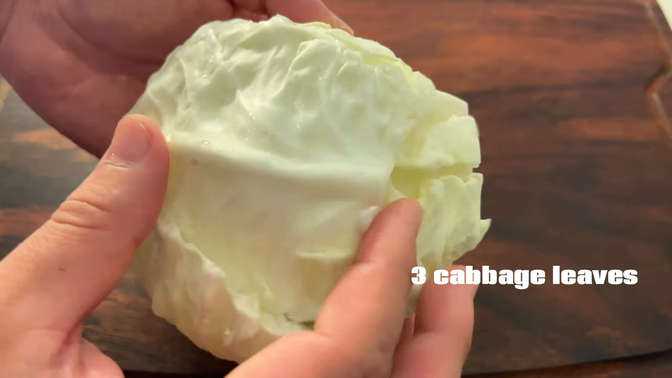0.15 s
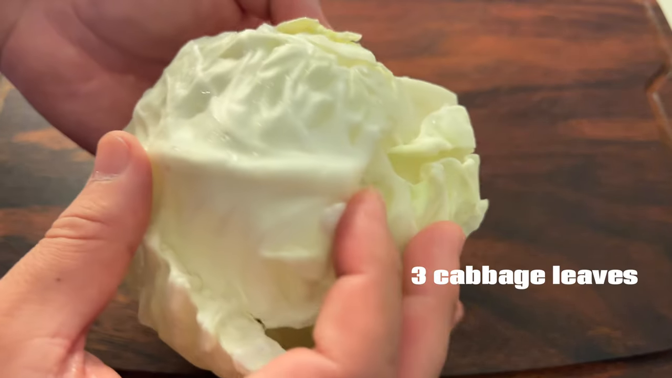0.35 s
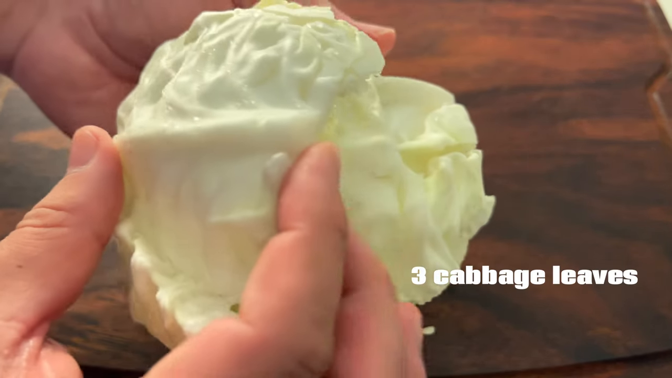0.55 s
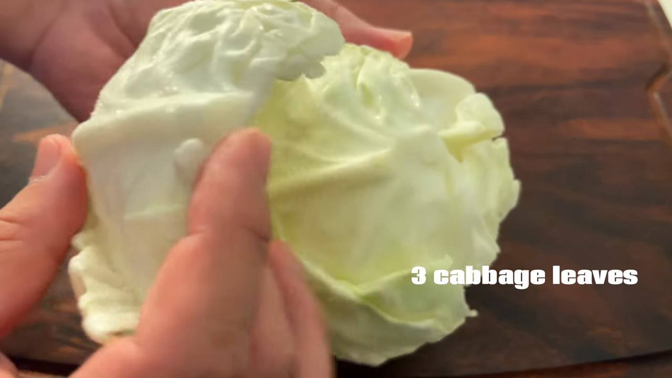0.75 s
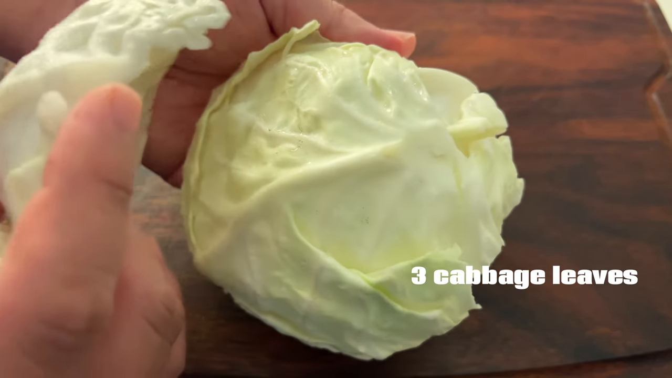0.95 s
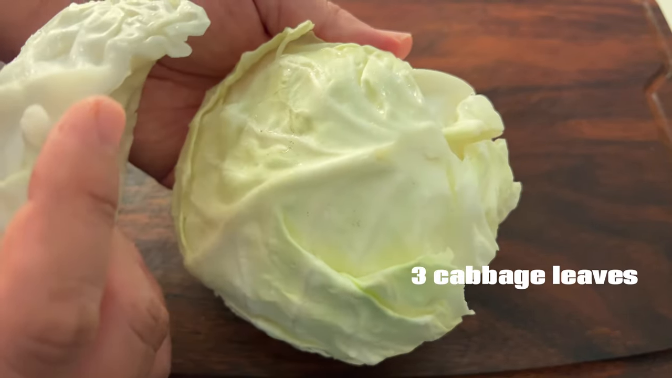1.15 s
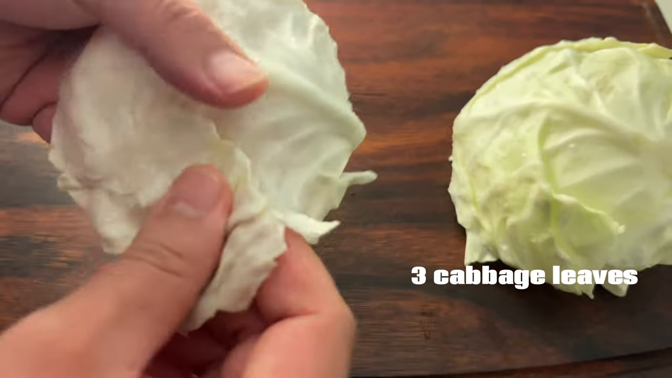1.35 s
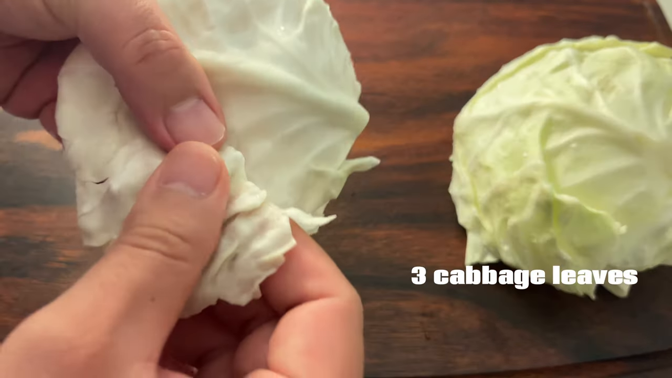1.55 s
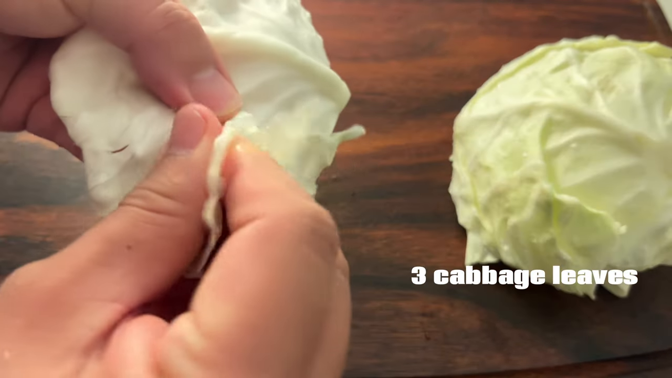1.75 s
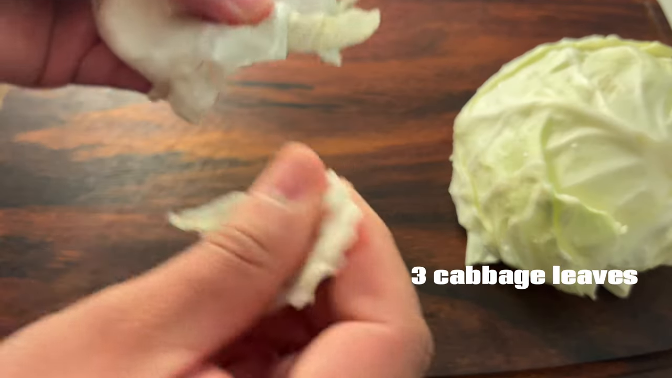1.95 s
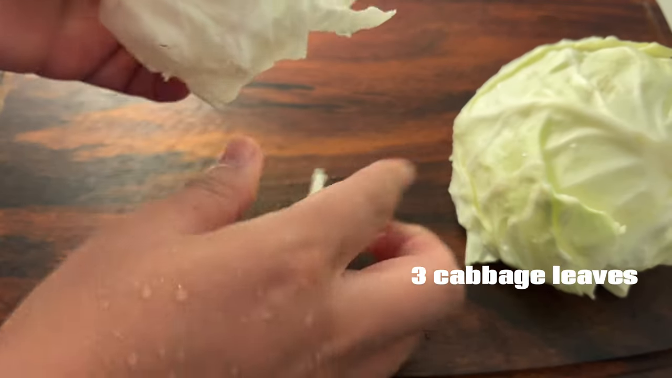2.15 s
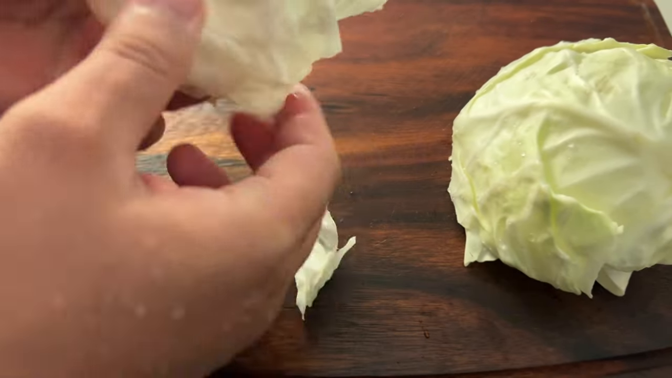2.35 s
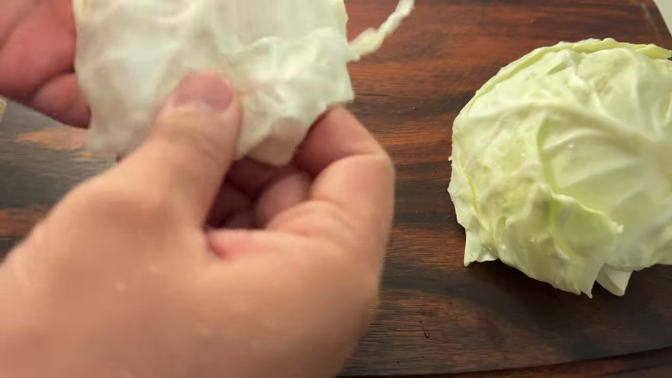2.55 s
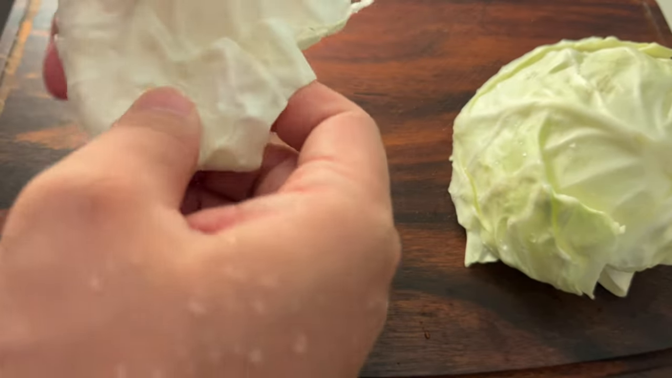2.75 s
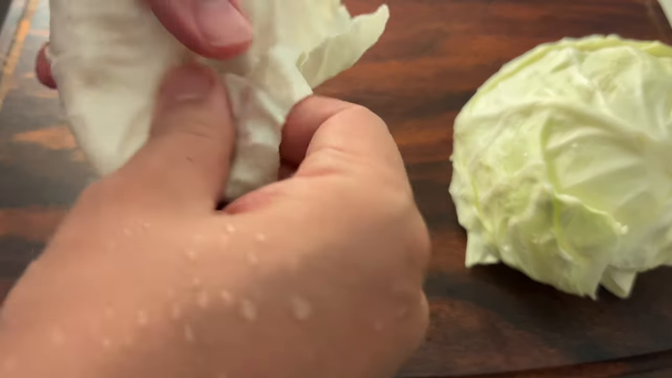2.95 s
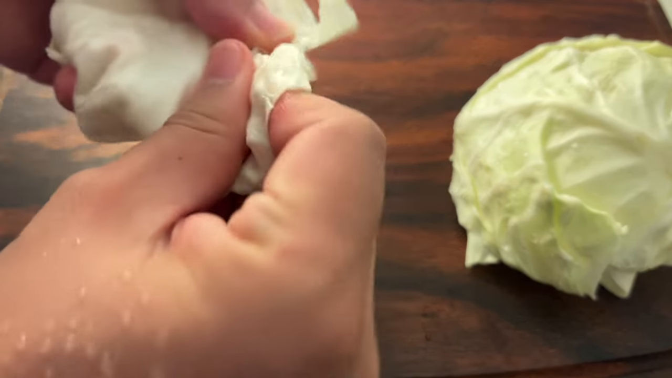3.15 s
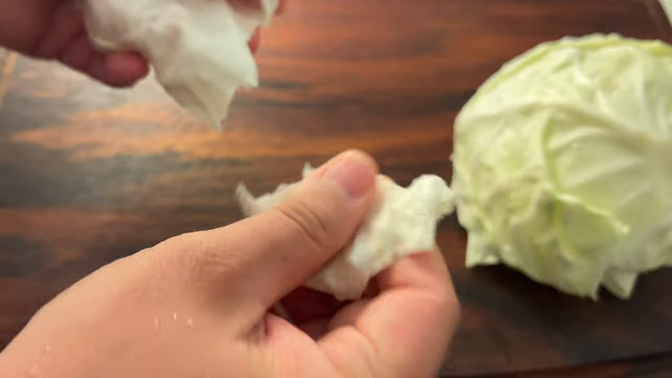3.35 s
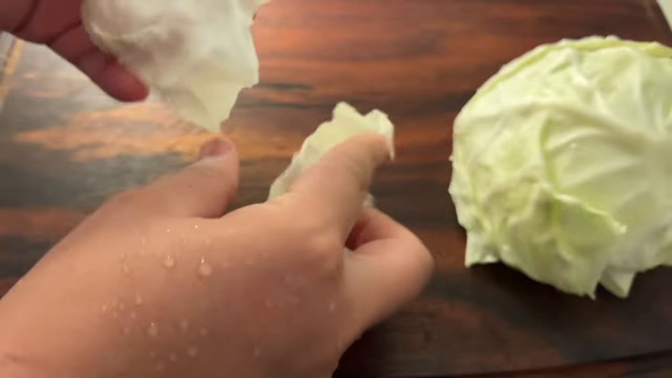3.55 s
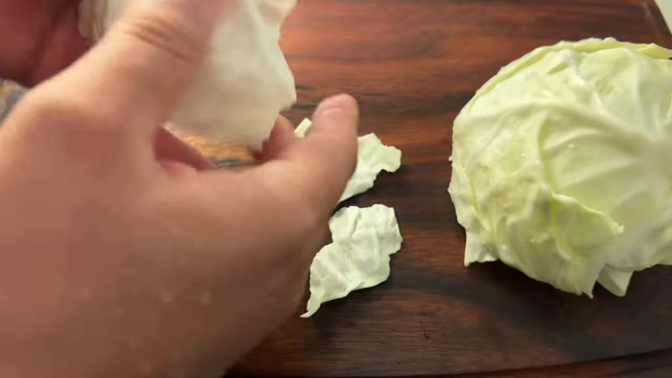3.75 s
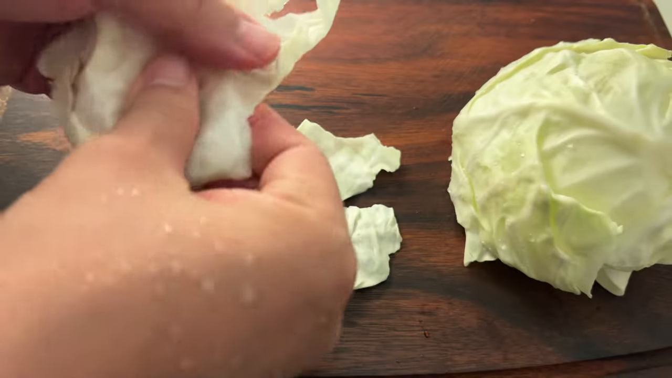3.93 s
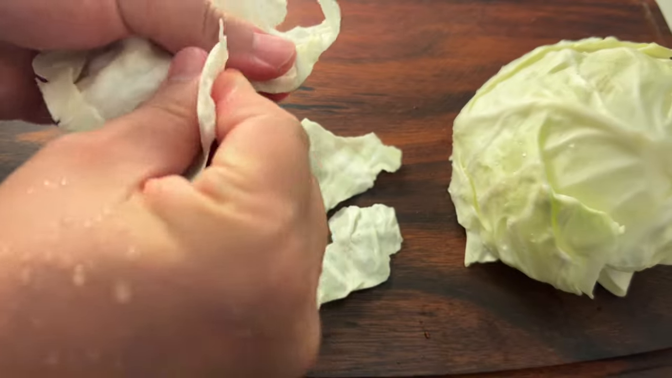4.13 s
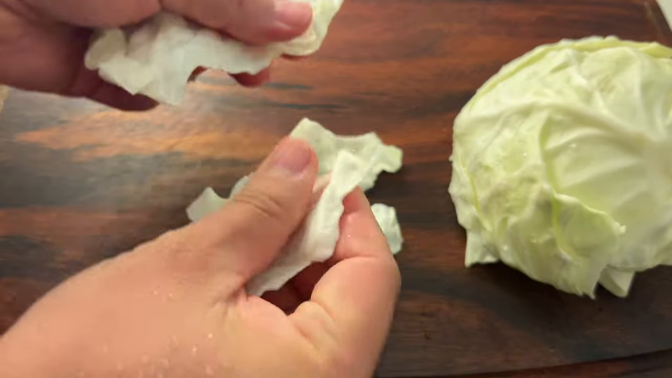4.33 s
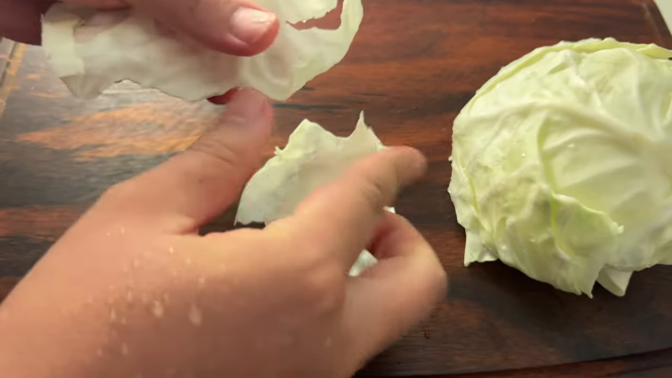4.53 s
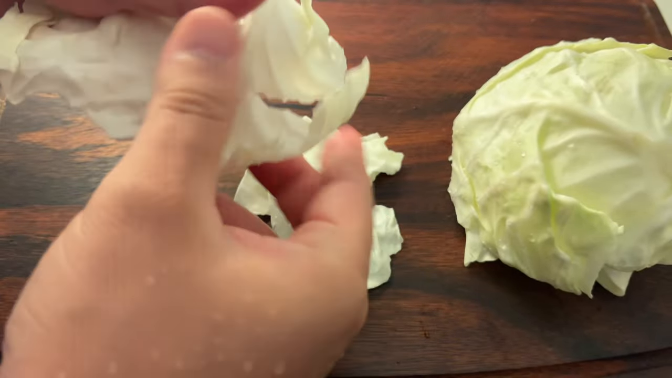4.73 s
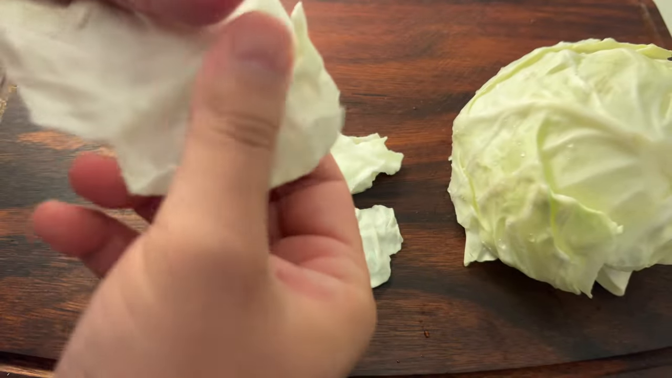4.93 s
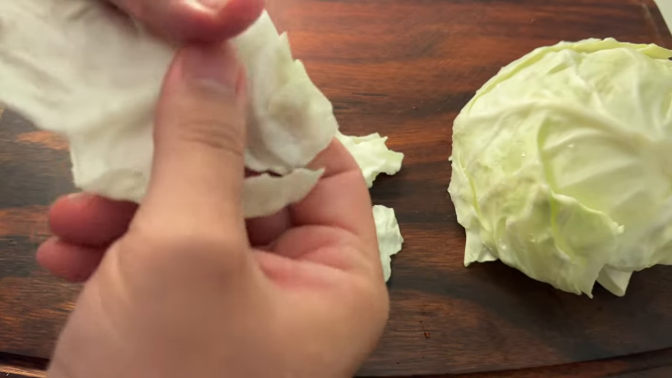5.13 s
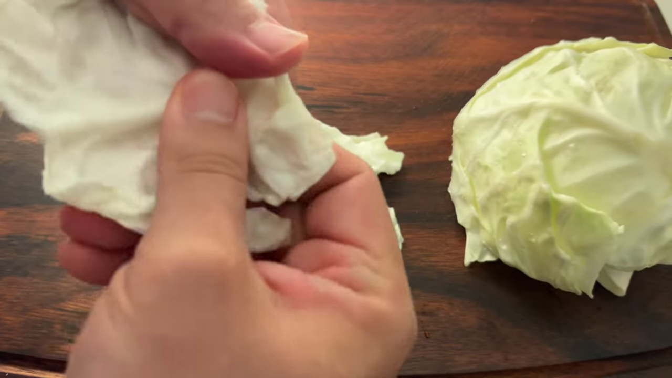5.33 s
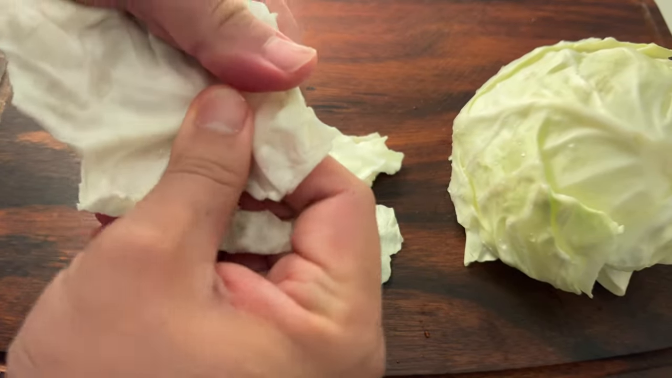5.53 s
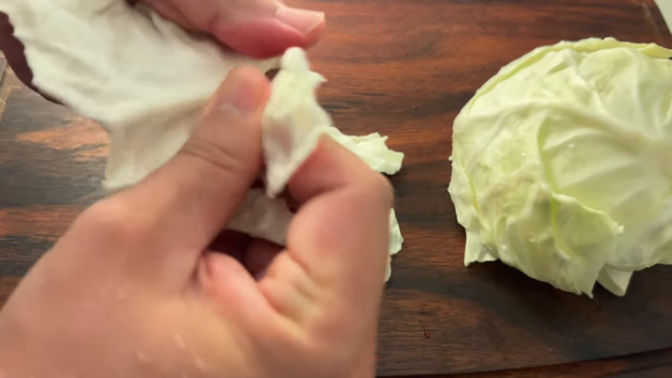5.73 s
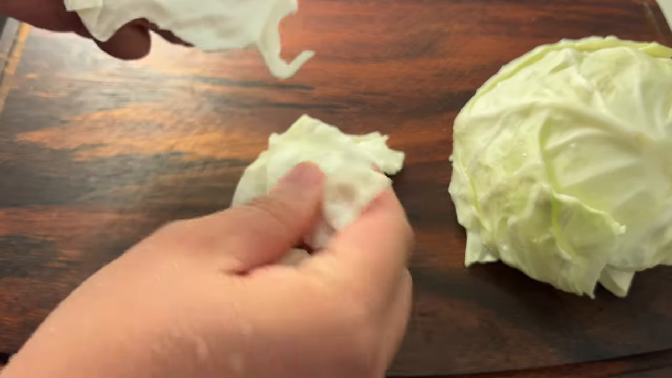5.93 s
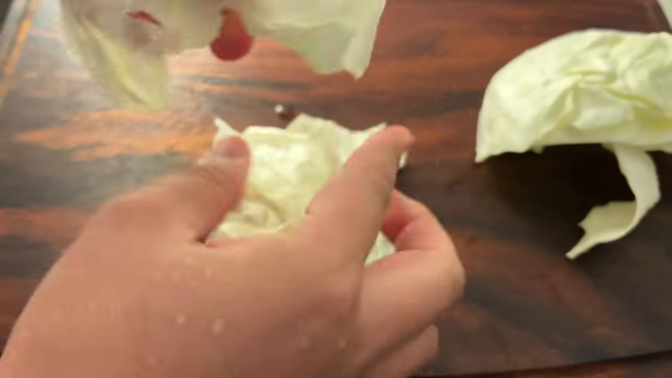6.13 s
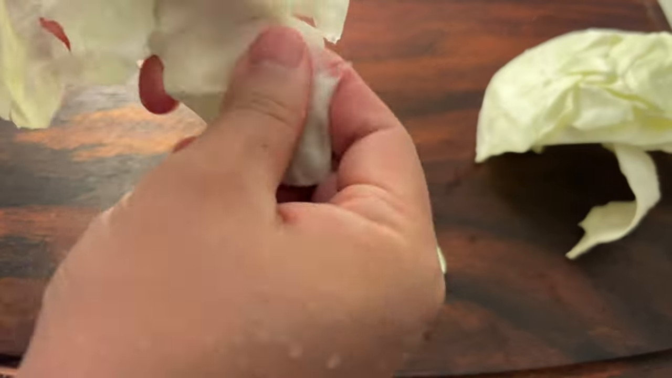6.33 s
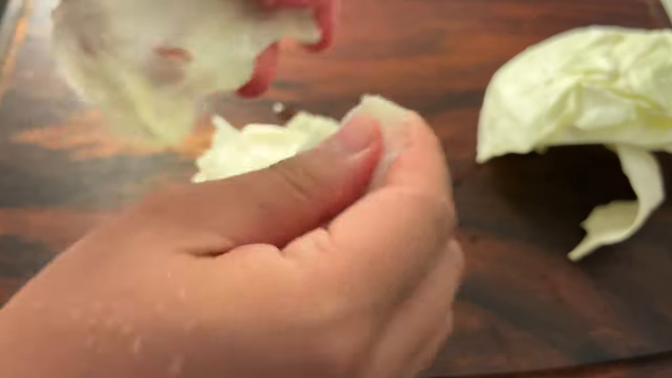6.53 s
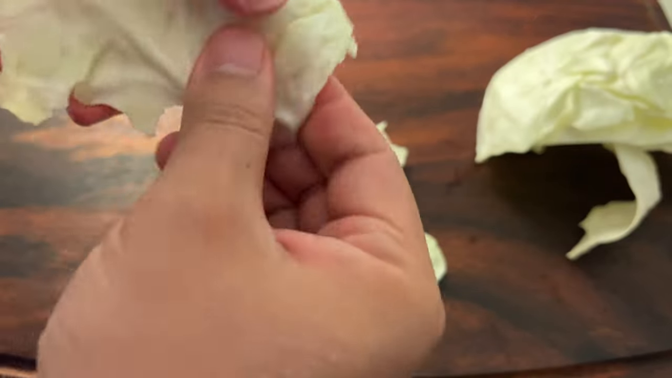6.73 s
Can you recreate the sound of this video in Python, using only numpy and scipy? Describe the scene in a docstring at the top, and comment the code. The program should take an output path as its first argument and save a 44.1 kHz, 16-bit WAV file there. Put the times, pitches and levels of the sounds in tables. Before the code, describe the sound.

Two hands peel and tear fresh cabbage close to a phone in a small kitchen. Light cracks and thin wet squeaks come first, then a near pause, then dense clusters of crisp snaps and ripping crackle. Single hard breaks with dull knocks follow later. Faint rumble and an intermittent low hum lie underneath. The sound is stereo, mostly dry, slightly stronger at left.

```python
"""Crisp cabbage leaves snap, rip and rustle in two hands over a kitchen table, close to a phone.
Ribs break as short noise cracks with a ring and a thud; tears are crowds of tiny bursts over hiss.
Wet leaves squeak as thin wavering tones, and low knocks are tones that die away.
Filtered noise makes the rumble and room air; a low hum, perhaps far traffic, comes and goes.
The phone's two microphone ports hear the hands with a small shift in time and level."""
import sys
import numpy as np
from scipy import signal
from scipy.fft import rfft, irfft, next_fast_len
from scipy.io import wavfile
from scipy.ndimage import uniform_filter1d

SR = 44100
rng = np.random.default_rng(int(sys.argv[2]) if len(sys.argv) > 2 else 0)


def put_to_file(sound):
    """Save the sound as 16-bit audio at rate SR, in the file named by the first command-line argument."""
    columns = np.atleast_2d(sound).T  # one column per channel
    safe = np.clip(columns, -1, 1)
    whole_steps = np.round(safe * 32767)
    wavfile.write(sys.argv[1], SR, whole_steps.astype(np.int16))


def gain_from_decibels(decibels):
    """Convert decibel values to linear amplitude factors."""
    exponent = np.asarray(decibels, float) / 20
    return 10 ** exponent


N = 298998  # length in samples

# tone colour of tearing leaf tissue: f/Hz, relative level per Hz/dB
TISSUE_COLOUR = [(700, -19.5), (1300, -5), (2100, -1), (3100, -5.5), (4500, -8.5), (6500, -8), (9000, -12),
                 (14000, -19)]
# tone colour of the treble fizz: f/Hz, relative level per Hz/dB
SPARKLE_COLOUR = [(3500, -69.5), (6000, 6.5), (8000, 18.5), (12000, 11.5), (16000, -4.5)]


def evened(x):
    """Scales to an rms (average strength) of 1."""
    return x / np.sqrt(np.mean(x ** 2) + 1e-20)


def peaked(x):
    """Scales to a peak of 1."""
    return x / abs(x).max()


def read(points, hz):
    """Reads a table between its points, on a log-frequency axis."""
    f, value = np.transpose(points)
    return np.interp(np.log(hz + 1), np.log(f + 1), value)


def along(rows):
    """Turns rows of time and values into one smooth curve per value, read at every sample."""
    s, *columns = np.transpose(rows)
    return [np.interp(np.arange(N) / SR, s, c) for c in columns]


def add(mix, s, sound):
    """Mixes a sound in at time s, cutting it off at the end of the mix."""
    part = mix[..., round(s * SR):][..., :sound.shape[-1]]
    part += sound[..., :part.shape[-1]]


def resonate(x, hz, width):
    """A resonance of gain 1: shifts hz down to zero, smooths, and shifts back."""
    turn = np.exp(2j * np.pi * np.cumsum(hz * np.ones(len(x))) / SR)
    r = np.exp(-np.pi * width / SR)
    smooth = signal.lfilter([1 - r], [1, -r], x / turn)
    return 2 * (turn * smooth).real


def colour(points, size=1024):
    """Makes a filter that starts at once (minimum phase) and has the given spectrum."""
    hz = abs(np.fft.fftfreq(size, 1 / SR))
    log_gain = np.log(gain_from_decibels(read(points, hz)) + 1e-5)
    phase = -signal.hilbert(log_gain).imag
    return np.fft.ifft(np.exp(log_gain + 1j * phase)).real[:size // 2]


def background():
    """Rumble and room air: patchy noise, nearly alike at both ports in the bass."""
    # spectrum within each of the two parts: f/Hz, relative level per Hz/dB
    air_colour = [(12, -33), (20, -66.5), (48, 3.5), (114, -6), (258, -15), (323, -12.5), (566, -19.5),
                  (634, -16), (750, -9.5), (1210, -14.5), (2000, -19.5), (2600, -34.5), (3830, -51.5),
                  (16500, -103.5)]
    # left-right likeness: f/Hz, correlation (1 = alike, 0 = unrelated, negative = opposed)
    likeness = [(60, 0.91), (180, 0.8), (550, -0.48), (1650, 0.31), (4970, 0.42), (15000, 0.1)]
    # strength of the rumble: t/s, level/dB
    rumble_level = [(0.0, -66.5), (0.04, -66.5), (0.41, -54), (0.79, -63), (1.24, -57.5), (1.47, -51),
                    (1.55, -52.5), (3.49, -57), (5.17, -58), (5.23, -52), (5.59, -64.5), (5.63, -51),
                    (5.91, -63), (6.78, -61)]
    split_hz, air_db = 505, -69.5

    frames, hz = N // 512 + 5, np.fft.rfftfreq(2048, 1 / SR)
    a, b, c, d, patches = rng.standard_normal((frames, len(hz), 5)).T
    patches = uniform_filter1d(patches, size=10, axis=0)
    patches = evened(uniform_filter1d(patches, size=6, axis=1))
    same = np.clip(read(likeness, hz), -1, 1)[:, None]
    left, unrelated = a + 1j * b, c + 1j * d
    z = np.array([left, same * left + np.sqrt(1 - same ** 2) * unrelated])
    z *= gain_from_decibels(read(air_colour, hz)[:, None] + 3.5 * patches)

    low = 1 / (1 + (hz[:, None] / split_hz) ** 4)
    rumble, air = (evened(signal.istft(z * share, nperseg=2048, noverlap=1536)[1][:, :N])
                   for share in (low, 1 - low))
    return gain_from_decibels(along(rumble_level)[0]) * rumble + gain_from_decibels(air_db) * air


def clicks(per_s, spread_db, clump):
    """Sparse clicks of random sign and size that come in clumps; per_s is their median rate."""
    busy = np.exp(clump * evened(uniform_filter1d(rng.standard_normal(N), size=300)))
    size = gain_from_decibels(spread_db * np.minimum(rng.exponential(1, N), 3)) * rng.standard_normal(N)
    return size * (rng.random(N) < per_s / SR * busy)


def grains(hz_low, hz_high, cycles, per_s, spread_db, count=16):
    """Short decaying wavelets of many pitches, each with its own share of clumped clicks."""
    train, which, out = clicks(per_s, spread_db, .9), rng.integers(0, count, N), np.zeros(N)
    for k, hz in enumerate(np.geomspace(hz_low, hz_high, count)):
        turns = np.arange(600) * hz / SR
        wavelet = np.sqrt(hz) * np.sin(2 * np.pi * turns) * np.exp(-turns / cycles)
        out += signal.oaconvolve(train * (which == k), wavelet)[:N]
    return evened(out)


def body(x):
    """The broad low resonances of leaf and cupped hand, each about half as wide as its pitch."""
    # f/Hz, relative level/dB
    resonances = [(420, -12), (680, -3), (950, 1.5), (1430, 0)]
    out = 0
    for k, (hz, db) in enumerate(resonances):
        tone = resonate(resonate(x, hz, hz / 2), hz, hz / 2)
        out = out + (-1) ** k * gain_from_decibels(db) * tone
    return out


def rip():
    """Cells burst along the tear, each with its own pitch, over a fine hiss; the leaf flexes below."""
    # fingers stroking and bending the leaf between tears: t/s, rustle level/dB, flexing level/dB
    handling = [(0.0, -84.5, -74), (0.23, -76.5, -59), (0.38, -61, -61.5), (0.68, -64.5, -54),
                (1.04, -85.5, -67), (1.72, -74.5, -58.5), (1.83, -65, -74), (2.25, -82, -66.5),
                (3.21, -48, -65), (3.47, -76.5, -71), (3.91, -74, -67), (4.14, -58, -55),
                (4.28, -61.5, -73), (4.61, -81, -67.5), (5.3, -60, -84), (5.89, -64, -66.5),
                (6.06, -79, -74), (6.78, -75.5, -67)]
    # tears running through the leaf: start t/s, length/s, crackle level/dB, flexing level/dB
    tears = [(0.177, 0.057, -55.5, -52.5), (.36, .07, -62, -52), (0.503, 0.014, -57.5, -49.5),
             (0.59, 0.068, -72, -54.5), (0.787, 0.076, -68.5, -67), (1.343, 0.061, -59, -54),
             (1.743, 0.12, -49.5, -54), (1.979, 0.037, -70, -73), (2.101, 0.051, -67.5, -68),
             (2.39, 0.12, -61.5, -67), (2.533, .07, -54, -56.5), (2.66, .08, -67.5, -57),
             (2.834, 0.047, -55, -60.5), (2.989, 0.13, -54.5, -52.5), (3.123, .17, -61, -55),
             (3.355, 0.065, -51.5, -59), (3.626, 0.04, -78, -64.5), (3.922, 0.11, -54, -53),
             (4.026, 0.087, -46, -66), (4.143, 0.12, -46.5, -49), (4.397, 0.059, -60.5, -81.5),
             (4.814, 0.031, -60.5, -48), (5.038, 0.017, -55.5, -58.5), (5.165, 0.082, -67.5, -65),
             (5.275, 0.089, -47.5, -53.5), (5.44, 0.049, -75.5, -75), (5.626, 0.037, -49, -50.5),
             (5.747, 0.052, -48, -51.5), (5.984, 0.013, -58, -67), (6.376, .03, -57.5, -60.5),
             (6.431, .04, -68, -58), (6.542, 0.02, -61.5, -68)]
    rise_s, fade_s = 0.014, 0.036
    cells_per_s, flexes_per_s = 900, 300
    tearing_db = -65  # a softer pull mostly strokes the leaf: smoother hiss, fewer bursting cells

    t = np.arange(N) / SR
    power = gain_from_decibels(2 * np.array(along(handling)))
    for s, length, *db in tears:
        rise = np.clip((t - s) / rise_s, 0, 1)
        fade = np.exp(-np.maximum(t - s - length, 0) / fade_s)
        power = power + np.outer(gain_from_decibels(2 * np.array(db)), (rise * fade) ** 2)
    crackle_db, flex_db = 10 * np.log10(power)
    sparkle_db = -59.5 + 1.252 * (crackle_db + 60)  # treble fizz grows faster than the crackle

    burst_share = .75 / (1 + gain_from_decibels(2 * (tearing_db - crackle_db)))
    cells = grains(1680, 12660, 4.3, cells_per_s, 4.83)
    hiss = rng.standard_normal(N)
    drive = np.sqrt(burst_share) * cells + np.sqrt(1 - burst_share) * hiss
    crackle = evened(signal.oaconvolve(drive, colour(TISSUE_COLOUR))[:N])
    sparkle = evened(signal.oaconvolve(drive, colour(SPARKLE_COLOUR))[:N])
    flexes = grains(232, 2050, 1.1, flexes_per_s, 2.3)
    flex = evened(body(flexes + 2.12 * rng.standard_normal(N)))
    return gain_from_decibels(crackle_db) * crackle + gain_from_decibels(flex_db) * flex + gain_from_decibels(sparkle_db) * sparkle


def snaps():
    """Each rib: a crack of two or three milliseconds, a brief ring, a thud, and fibres parting just after."""
    # ribs breaking: t/s, crack level/dB, ring f/Hz, thud level/dB, parting fibres over the crack/dB
    ribs = [(0.2209, -34, 1570, -33.5, -14), (0.3618, -32.5, 6740, -64, 2), (0.3815, -22.5, 2290, -40, -23),
            (0.4024, -29.5, 1540, -32.5, -8), (0.5056, -27.5, 1930, -69.5, -4),
            (0.601, -34.5, 1670, -58, -12), (0.6409, -42, 1500, -40, 1), (0.6606, -32, 2180, -49, -21),
            (0.8759, -31, 1750, -41.5, -18), (1.3508, -37.5, 1720, -32.5, -23), (1.6617, -31, 4700, -39, 1),
            (1.702, -32.5, 5470, -52, 12), (1.7461, -17, 7300, -23.5, -3),
            (1.7655, -22.5, 6850, -29.5, -13), (1.8018, -27.5, 8150, -32, -21), (1.8099, -28, 6900, -30, 3),
            (1.8362, -28.5, 5520, -57, 4), (1.877, -29.5, 3050, -50, -4), (1.8875, -35, 1770, -38.5, -11),
            (1.9205, -37, 4620, -49, -24), (1.9744, -34.5, 9600, -72, -1), (2.1003, -40, 6400, -63, -17),
            (2.3988, -46, 1990, -58, -13), (2.4408, -26, 9500, -61, -31), (2.5412, -32.5, 1530, -33.5, -17),
            (2.5557, -36, 2430, -37.5, -6), (2.7038, -41.5, 2080, -42, -26), (2.7168, -30, 6540, -65, -11),
            (2.7594, -40, 6840, -37.5, -18), (2.855, -33.5, 9500, -53, 20.5), (2.956, -41, 4360, -50, -9),
            (2.9739, -22, 3800, -32.5, -4), (2.9891, -24.5, 4460, -28, -3),
            (3.0028, -16.5, 1940, -25.5, -11.5), (3.0383, -22, 1480, -48, 6), (3.052, -20.5, 3560, -34, 1),
            (3.0652, -17, 9400, -50, -12), (3.0747, -23.5, 2540, -47, -19), (3.1293, -30, 2550, -52, -23),
            (3.1425, -27, 4990, -63, -4), (3.1735, -22, 1590, -41, 17), (3.236, -23.5, 3750, -42, -2),
            (3.2706, -31.5, 4800, -39, -4), (3.3651, -30, 3330, -42, -33), (3.3698, -25.5, 2240, -43, 17),
            (3.3874, -34, 2240, -50, -22), (3.6492, -43.5, 1770, -46, 4), (3.8147, -45.5, 2800, -56, -6),
            (3.8459, -39, 6060, -63, -14.5), (3.912, -46.5, 4960, -55.5, -1), (3.926, -39, 4760, -44, -5),
            (3.9759, -22.5, 3300, -24, -11), (4.002, -9, 4260, -24.5, -23.5),
            (4.0114, -24.5, 6710, -35, -17), (4.029, -21, 8900, -51, -17), (4.075, -30, 4500, -62, -7),
            (4.1022, -29, 4160, -36.5, 2.5), (4.1593, -26.5, 4420, -28.5, -15),
            (4.1753, -26.5, 4330, -55, -9), (4.1991, -19.5, 1770, -44, -1), (4.2234, -24.5, 3080, -47, -14),
            (4.238, -17.5, 3130, -30, -20.5), (4.2775, -23.5, 5970, -52, -18),
            (4.4114, -44, 7000, -62, -15), (4.4408, -45, 4630, -62, -11.5), (4.778, -42.5, 1880, -58, -12),
            (4.8243, -36.5, 1810, -35, -13), (4.8311, -30.5, 1870, -48, -15),
            (4.9147, -38.5, 6250, -66, -10), (4.9925, -43.5, 1810, -56, -12), (5.0349, -39, 4530, -57, 5),
            (5.054, -38.5, 1960, -65, -9), (5.1457, -42, 6570, -64, -20), (5.1674, -17.5, 8540, -40.5, -37),
            (5.2429, -33.5, 5310, -53, 18), (5.2934, -38, 2550, -62, -27), (5.3168, -5.5, 1546, -24.5, -26),
            (5.461, -39.5, 6750, -66, -22), (5.4957, -31, 7140, -53, -19), (5.6196, -11, 7560, -19, -20),
            (5.7546, -23, 2580, -39, -21), (5.7707, -27.5, 4500, -36, -15), (5.8042, -31.5, 3870, -40, -12),
            (5.85, -33.5, 9400, -66, -26), (5.9952, -26.5, 8500, -49, -32), (6.0042, -33, 8900, -47, -33),
            (6.0794, -43, 3690, -51, -2.5), (6.2529, -44, 2980, -46.5, -21), (6.3048, -42.5, 6760, -50, -6),
            (6.3985, -27, 1910, -55, -30.5), (6.4277, -36, 8650, -62, -27),
            (6.4367, -20.5, 8800, -39.5, -6), (6.4534, -24, 3910, -27, -35),
            (6.4912, -21.5, 4000, -66, -44), (6.503, -30, 4140, -63, -32), (6.5533, -44, 4190, -62, -7),
            (6.566, -30.5, 4840, -62, -2), (6.5945, -37, 2830, -79, -29), (6.6987, -40, 2000, -50, -16),
            (6.7457, -42, 2720, -54, -3), (6.7601, -21, 5530, -36, -13)]
    t, out = np.arange(3000) / SR, np.zeros(N)
    tissue, fine = colour(TISSUE_COLOUR), colour(SPARKLE_COLOUR)
    sudden = np.exp(-t / .0013) * np.minimum(t / .0005, 1)
    noises = rng.standard_normal((len(ribs), 3, len(t)))
    for (s, db, hz, thud_db, fibres_db), (crack_noise, thud_noise, c) in zip(ribs, noises):
        uneven = np.exp(0.62 * evened(uniform_filter1d(c, size=40)))
        fibres = gain_from_decibels(fibres_db) * uneven * np.exp(-t / 0.012)
        octaves = np.log2(hz / 4000)
        sparkle_db = -6 + 0.3853 * (db + 30) + 3.5 * octaves  # louder and higher snaps are brighter
        ring_db = -0.5 + 3 * octaves  # low rings are weaker

        burst = crack_noise * (sudden + fibres)
        ring = resonate(crack_noise * (sudden + .5 * fibres), hz, .5 * hz)
        ring = resonate(ring, hz, .5 * hz)
        crack = evened(signal.oaconvolve(burst, tissue)[:len(t)]) + gain_from_decibels(ring_db) * evened(ring)
        sparkle = signal.oaconvolve(crack_noise * (sudden + 0.81 * fibres), fine)[:len(t)]
        thud = body(thud_noise * (np.exp(-t / 0.0015) + fibres))

        bright_crack = peaked(crack) + gain_from_decibels(sparkle_db) * peaked(sparkle)
        add(out, s, gain_from_decibels(db) * bright_crack + gain_from_decibels(thud_db) * peaked(thud))
    return out


def squeaks():
    """Wet leaf squeaking on leaf: short thin tones that waver in pitch and level."""
    # t/s, length/s, f/Hz, level/dB
    rubs = [(.735, .11, 1530, -57), (.515, .04, 2200, -54), (.635, .04, 1250, -54), (5.86, .13, 2010, -64),
            (5.86, .13, 1500, -65), (5.37, .07, 1700, -63), (6.695, .025, 1900, -56),
            (4.83, .06, 1950, -56)]
    out = np.zeros(N)
    for s, length, hz, db in rubs:
        noise = rng.standard_normal((2, round(length * SR)))
        waver, flutter = evened(uniform_filter1d(noise, size=300))
        turns = np.cumsum(hz * (1 + .003 * waver)) / SR
        tone = (1 + .15 * flutter) * np.sin(2 * np.pi * turns)
        add(out, s, gain_from_decibels(db) * np.sqrt(2) * tone * signal.windows.tukey(len(tone), .4))
    return out


def hum():
    """Low tones that drift, waver in pitch and flutter in level."""
    # start t/s, length/s, first f/Hz, last f/Hz, level/dB
    tones = [(1.35, 0.16, 122, 121, -45.5), (1.5, 0.24, 118, 109.7, -54), (1.34, 0.36, 52, 51.7, -59.5),
             (1.66, 0.63, 105, 87.9, -60.5), (2.36, 1.084, 122, 120.6, -56.5),
             (3.62, 1.57, 105, 108.5, -63.5), (5.25, .14, 105, 103, -59)]
    pitch_waver, flutter_db = .008, 2.2  # typical size: share of the pitch, dB
    out = np.zeros(N)
    for s, length, first_hz, last_hz, db in tones:
        slow = evened(uniform_filter1d(rng.standard_normal((2, N)), size=2500))
        waver, flutter = slow[:, :round(length * SR)]
        hz = np.linspace(first_hz, last_hz, len(waver)) * (1 + pitch_waver * waver)
        tone = np.sin(2 * np.pi * (np.cumsum(hz) / SR + rng.random()))
        level = np.sqrt(2) * gain_from_decibels(db + flutter_db * flutter)
        add(out, s, level * tone * signal.windows.tukey(len(hz), .25))
    return out


def knocks():
    """Hand and cabbage felt through the table: low tones build over one cycle and sag as they die."""
    # t/s, level/dB, f it sags to/Hz, time to fade by 60 dB/s
    bumps = [(1.344, -44, 133, 0.031), (1.746, -49, 313, 0.06), (2.72, -49, 131, 0.015),
             (2.995, -37.5, 326, 0.035), (3.168, -37.5, 135, 0.022), (3.662, -51.5, 553, 0.081),
             (3.996, -61, 400, 0.029), (4.239, -47, 233, 0.073), (4.824, -45.5, 450, 0.1),
             (5.22, -31, 129, 0.08), (5.314, -46, 132, 0.048), (5.619, -17, 282, 0.013),
             (5.756, -37.5, 314, 0.03), (6.45, -43.5, 465, 0.026)]
    t, out = np.arange(6000) / SR, np.zeros(N)
    for s, db, hz, t60 in bumps:
        turns = np.cumsum(hz * (1 + 0.098 * np.exp(-t / 0.0036))) / SR
        level = gain_from_decibels(db - 60 * t / max(t60, .01)) * np.minimum(turns, 1)
        add(out, s, level * np.sin(2 * np.pi * turns))
    return out


def ports(near):
    """Near sound reaches the left port first and louder, except in the bass."""
    # f/Hz, left over right/dB
    louder_left = [(100, -1), (350, 11), (900, 4), (2000, 4.5), (4500, 7.5), (9000, 2), (15000, 0)]
    # f/Hz, time by which the left port leads/s
    left_lead = [(250, 0), (800, .00027), (2000, .00025), (5000, .0002), (8700, .000205), (12000, .00016)]
    size = next_fast_len(N + 2048)
    hz = np.fft.rfftfreq(size, 1 / SR)
    louder = gain_from_decibels(read(louder_left, hz) / 2)
    lag = np.exp(-2j * np.pi * hz * read(left_lead, hz))
    return irfft(rfft(near, size) * np.array([louder, lag / louder]), size)[:, :N]


def kitchen(x, count=3):
    """Sparse echoes, each band dying at its own speed; the sets fade in and out in turn at a steady rate."""
    # f/Hz, time to fade by 60 dB/s
    fade_times = [(300, 0.084), (1000, 0.095), (4000, 0.2), (12000, 0.05)]
    length, out = SR // 2, np.zeros((2, N))
    starts = np.arange(150, length - 20, 20)
    for k in range(count):
        taps = np.zeros((2, length))
        at = starts + rng.integers(0, 20, (2, len(starts)))
        np.put_along_axis(taps, at, rng.choice([-1., 1.], at.shape), 1)
        hz, t, z = signal.stft(taps, SR, nperseg=128)
        fade = gain_from_decibels(-60 * t / read(fade_times, hz)[:, None])
        tail = signal.istft(z * fade, SR, nperseg=128)[1]
        tail = tail / np.linalg.norm(tail[0])
        share = np.sqrt(2 / count) * np.cos(np.pi * (9 * np.arange(N) / SR + k / count))
        out += signal.fftconvolve((share * x)[None], tail, axes=1)[:, :N]
    return gain_from_decibels(-6.5) * out


def scene():
    """Hands in the kitchen over the background."""
    # where the hands work: t/s, left over right/dB
    hands = [(0, 0), (6.78, 1)]
    near = rip() + snaps() + squeaks() + knocks()
    side = gain_from_decibels(along(hands)[0] / 2)
    work = (ports(near) + kitchen(near)) * np.array([side, 1 / side])
    return work + background() + hum()


def top_cut(x):
    """Nothing passes above the cut-off."""
    return signal.sosfilt(signal.butter(12, 16980, fs=SR, output="sos"), x)


def record(dry):
    """Overall tone: deep bass cut, narrow dips near 10.3 and 13.9 kHz, top end rolled off."""
    # f/Hz, gain/dB
    overall_tone = [(25, -8), (45, 0), (9400, 0), (10300, -20), (11200, -2), (12600, -2), (13900, -20),
                    (14900, 2), (16100, 7), (16500, -10), (16900, -70)]
    heard = signal.oaconvolve(dry, colour(overall_tone, size=8192)[None], axes=1)[:, :N]
    return top_cut(heard)


dry = scene()
out = record(dry)
put_to_file(out)
```